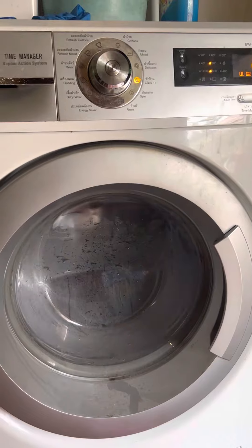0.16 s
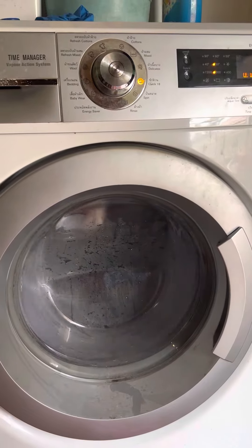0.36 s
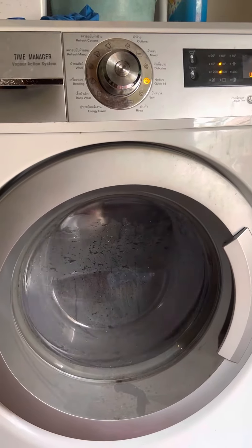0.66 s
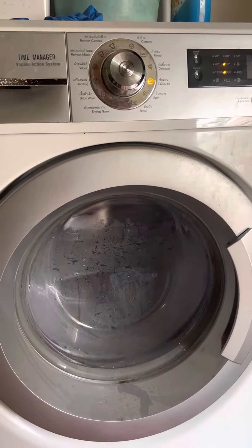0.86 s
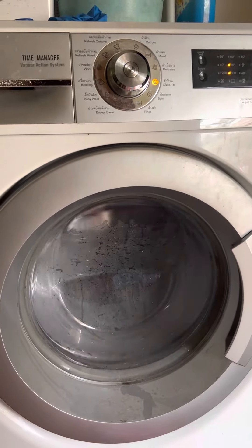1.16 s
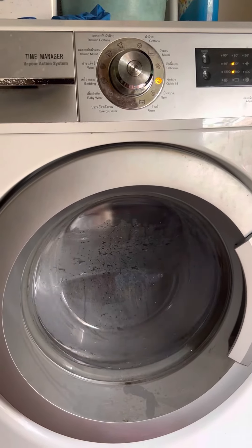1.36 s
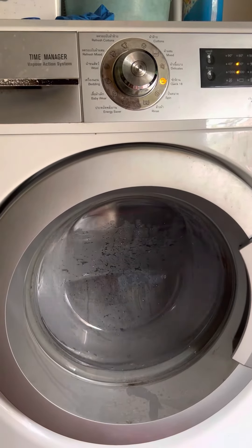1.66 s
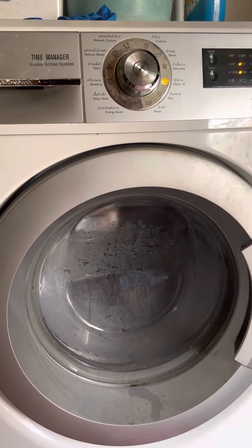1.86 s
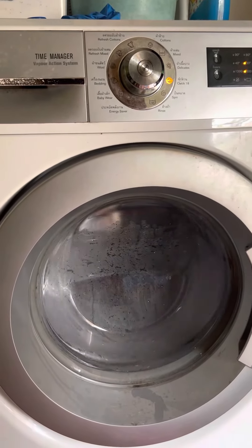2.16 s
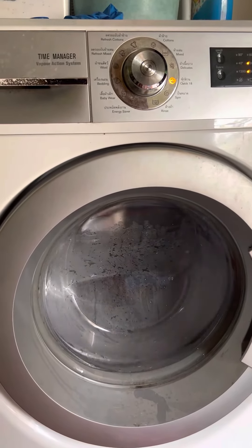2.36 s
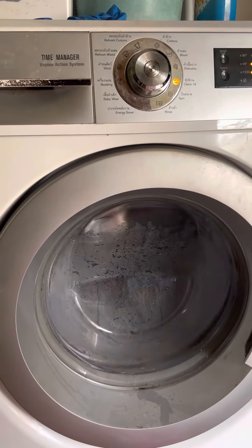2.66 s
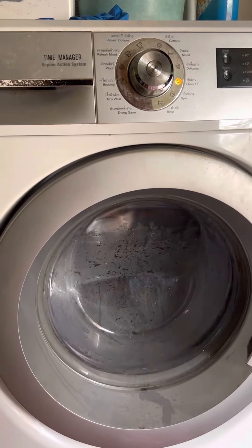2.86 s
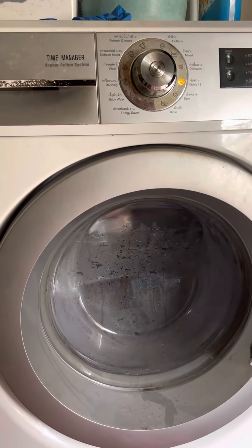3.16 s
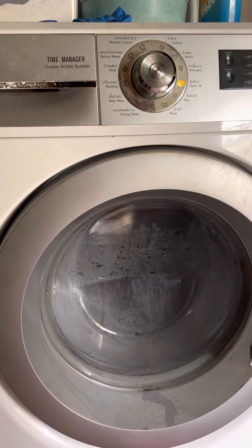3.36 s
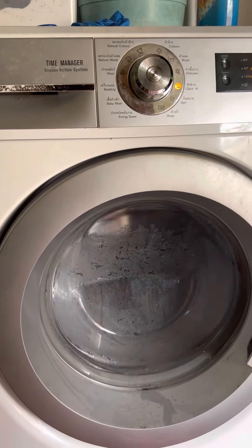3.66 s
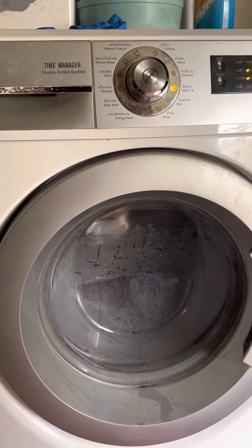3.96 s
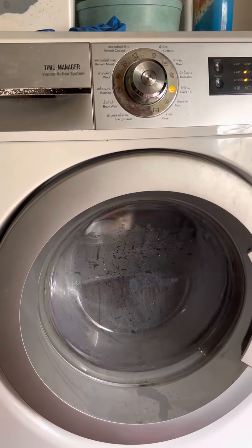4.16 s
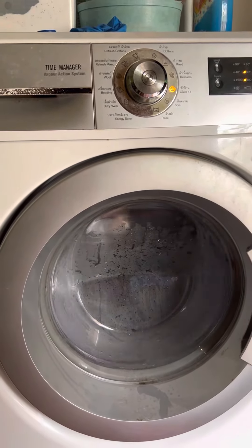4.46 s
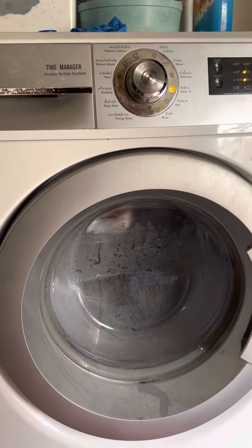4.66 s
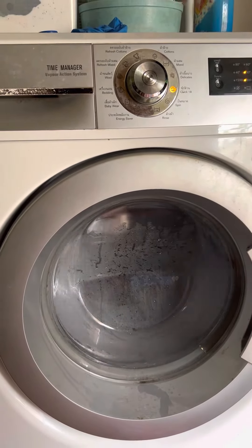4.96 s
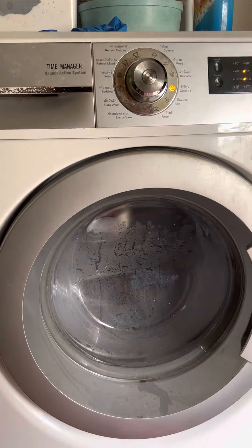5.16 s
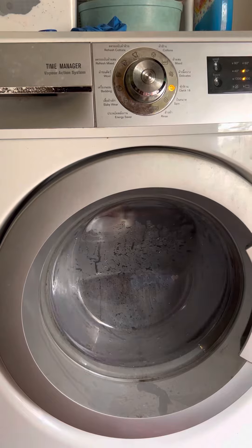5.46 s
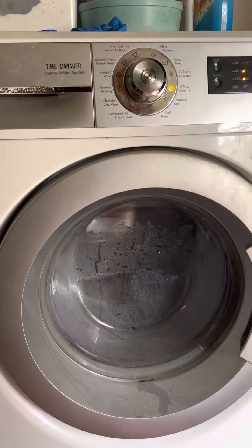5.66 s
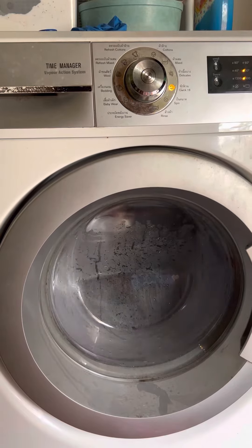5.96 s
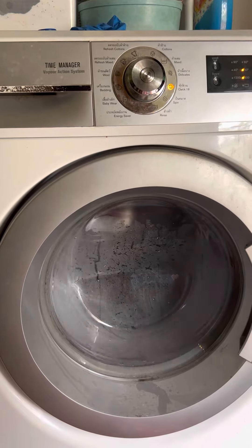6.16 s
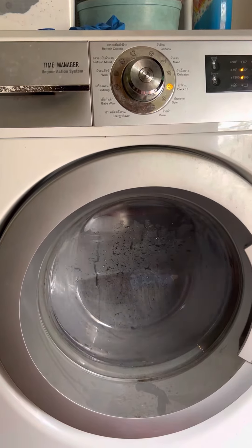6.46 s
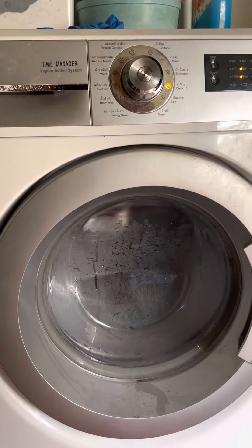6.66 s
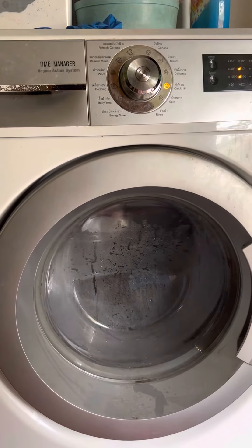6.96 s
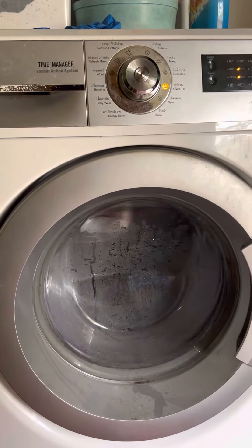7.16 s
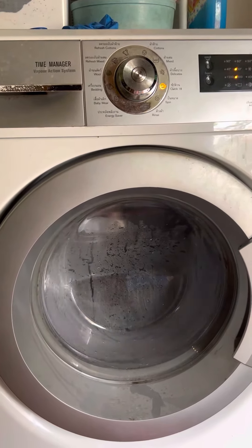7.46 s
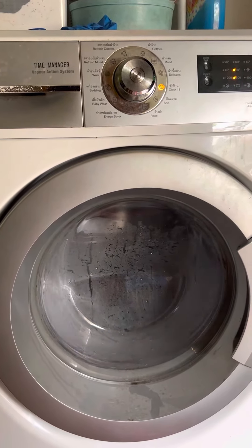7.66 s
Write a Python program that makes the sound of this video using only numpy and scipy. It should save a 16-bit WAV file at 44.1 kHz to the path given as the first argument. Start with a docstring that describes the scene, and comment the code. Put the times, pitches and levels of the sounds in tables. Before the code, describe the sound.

A front-loading washing machine spins in a small hard room, heard from just in front of its door. Fast, even knocks and a pulsing rumble run throughout, with a light hiss. Small clicks tap the door glass early on as the drum gains a little speed. The panels and door rattle hardest through the middle, then the shaking eases into a steadier drone.

```python
"""Rhythmic knocking and rattling: a front-loading washing machine spins up to speed in a small hard room.
The unbalanced load is a periodic force on the tub, so bearing knocks, panel rings and scuffs return
at the same drum angles every turn. Beneath them lie a rumble that repeats with the drum, air and belt
hiss, a booming floor and a faint motor whine. A phone with two microphones listens before the door."""
import sys
import numpy as np
from scipy import signal
from scipy.fft import rfft, irfft
from scipy.io import wavfile
from scipy.ndimage import uniform_filter1d

SR = 44100
rng = np.random.default_rng(int(sys.argv[2]) if len(sys.argv) > 2 else 0)


def dump(signal):
    """Clip the signal to [-1, 1] and save it as 16-bit WAV at the path in sys.argv[1]."""
    limited = np.clip(np.atleast_2d(signal).T, -1, 1)
    pcm = np.round(limited * 32767).astype(np.int16)
    wavfile.write(sys.argv[1], SR, pcm)


N = 343980
TIME = np.arange(N) / SR


def bearing_knocks(turns):
    """Impact excitation: seven knocks a turn push and pull alternately, ringing the tub and frame."""
    # Each row is one knock: level in dB at the start, near full speed, shaking hardest, settled.
    strengths = [(-18, -15, -13.5, -23), (-20, -20, -5.5, -6.5), (-12, -7, -28, -25), (-16, -10, -6, -14),
                 (-7, -15.5, -45, -20), (-23, -15, -18.5, -17), (-22, -18, -12, -16.5)]
    # Each row is a mode of the sprung tub or the frame: frequency in Hz, level in dB, T60 in seconds.
    tub_modes = [(140.4, -6, 0.047), (152.7, -1.5, 0.053), (211.6, 1, 0.03)]
    frame_modes = [(210.5, 1.5, 0.022), (250, -1.5, 0.041), (321, -8.5, 0.029)]
    stages_s = (1.4, 2.2, 3.3, 5.5, 6.2)
    levels_db = [np.interp(TIME, stages_s, [first, fast, hard, hard, last])
                 + staged(2, 4, 1) * wander(2.44) for first, fast, hard, last in strengths]
    first_angle = staged(.015, -.055, -.06)
    blows = np.zeros(N)
    for k, db in enumerate(levels_db):
        at = passes(turns - first_angle, k / len(levels_db))
        blows += (-1) ** k * uneven_blows(at, db[at], slip_s=.0001, scatter_db=.81)
    tub_share = staged(.44, .47, .8)
    tub = strike(blows * tub_share, tub_modes, contact_s=.0019)
    frame = strike(blows * (1 - tub_share), frame_modes, contact_s=.0047)
    # The cabinet is too small to radiate long wavelengths.
    return signal.sosfilt(signal.butter(3, 109, "high", fs=SR, output="sos"), tub + frame)


def loose_parts(turns):
    """Modal ringing: each loose part is struck at its own drum angles and decays freely."""
    # Each part lists its modes: frequency in Hz, level in dB, T60 in seconds.
    part_modes = { "left side panel": [(279.5, 1, 0.36), (255, -11, 0.15)],
                  "back panel": [(308.5, 0, 0.26)], "right side panel": [(192.23, 3.5, 0.29),
                  (114.94, -9, 0.21), (160.12, -5, 0.22)], "control panel": [(915, 0, 0.1), (1004, -2, 0.1),
                  (1100, -5, 0.08)], "front panel": [(657, 6.5, 0.07), (615, -5, 0.05)],
                  "kick plate": [(705, 0, 0.06), (738, -4, 0.06)], "dial": [(918, 0, .11)],
                  "top panel": [(376, 0, .1)], "door handle": [(577, 0, .12)], "zip": [(1800, 0, .015),
                  (1450, -4, .01), (2150, -4, .01), (3300, -14, .005)], "door": [(512, 0, 0.085),
                  (576, -5, 0.07)], "lid": [(378.5, -1, 0.15), (415.3, 2.5, 0.073), (455.2, -0.5, 0.072)],
                  "soap drawer": [(1320, -1, .05), (1420, 0, .055)], "plastic trim": [(1960, 0, .05),
                  (2060, -1, .05), (2310, 0, .05)], }
    # Each row: part, drum angle in turns, start and end in seconds, first and last level in dB.
    rattles = [ ("left side panel", .3, 0.87, 1.73, -20.5, -18),
               ("left side panel", 0.199, 6.24, 7.8, -29, -27.5),
               ("left side panel", .94, 2.8, 4.3, -23, -20), ("left side panel", .17, 3.2, 4.3, -23, -21),
               ("left side panel", 0.09, 4.6, 6, -19, -23), ("left side panel", .32, 4.4, 5.9, -24, -26),
               ("back panel", .3, 5.4, 6.4, -27, -23), ("back panel", .3, 6.7, 7.8, -28, -29),
               ("right side panel", 0.252, 0, 2.3, -23, -17.5),
               ("right side panel", .42, 3.43, 5, -18.5, -20),
               ("right side panel", 0.302, 5.56, 6.8, -26, -28),
               ("right side panel", 0.1606, 6.4, 9, -22.5, -25),
               ("control panel", 0.33, 1.5, 2.55, -30.5, -32.5), ("dial", .35, 4, 4.4, -28, -30),
               ("control panel", .15, 5.2, 6.9, -36, -36), ("control panel", .11, 7.3, 7.8, -35, -31),
               ("door handle", .16, 0, 1.3, -25, -23), ("front panel", .24, 1, 1.4, -28, -24),
               ("front panel", .185, 1.8, 2.6, -13.5, -12), ("kick plate", .09, 1.3, 2.8, -25, -21),
               ("kick plate", .1, 3, 4.5, -25, -28), ("kick plate", .08, 5.6, 7.8, -22, -21),
               ("door handle", .17, 5.9, 7.36, -22.5, -24.5), ("door handle", .37, 2.7, 3.5, -16.5, -19.5),
               ("door handle", .25, 5.4, 5.2, -23, -25.5), ("zip", .64, 1.7, 2.7, -29, -30),
               ("zip", .96, 2.8, 3.4, -30, -29), ("front panel", 0.48, 1.6, 2.3, -23.5, -31),
               ("front panel", 0.16, 3, 5.2, -22.5, -26), ("front panel", 0.18, 5.4, 6.7, -27.5, -23),
               ("door", 0.21, 0, 1.2, -23, -25), ("door", 0.1587, 5.5, 6.9, -24.5, -24.5),
               ("door", .4, 2.5, 4.53, -15.5, -12), ("door", .38, 4.86, 5.5, -23, -21),
               ("door", 0.69, 0, 1, -24.5, -28.5), ("door", .8, 1.63, 2.8, -20.5, -14.5),
               ("door", .8, 4.1, 5.96, -22, -27.5), ("lid", .28, .3, 1.4, -17, -19),
               ("lid", .385, 3, 3.8, -21.5, -17), ("lid", .29, 5, 5.55, -19, -22.5),
               ("top panel", 0.162, 7.16, 8.8, -26, -25), ("top panel", .24, 4.6, 5.47, -20.5, -21),
               ("lid", .83, 0.63, 3.12, -20.5, -17), ("lid", .85, 4.3, 5.98, -19, -20),
               ("soap drawer", .28, 1.7, 2.8, -40, -40), ("soap drawer", .255, 3.6, 5.5, -25, -29),
               ("plastic trim", 0.32, 3.8, 4.7, -25.5, -26), ("plastic trim", .33, 3.8, 6.15, -32.5, -28.5),
               ]
    # Each row: time in seconds, depth in dB to which the leaning tub mutes the left panel.
    muting = [(2.9, 0), (3.7, 9), (4.6, 12), (5.6, 12), (6.3, 6)]
    # Each row is one blow, of the trim or of a zip on the door glass: time in seconds, peak in dB.
    trim_snaps = [(5.6755, -23.5), (5.7633, -22)]
    zip_clacks = [(0.185, -28), (0.2957, -27), (0.405, -23.5), (0.513, -25), (0.622, -23), (0.834, -31),
                  (1.02, -34), (1.047, -32), (1.128, -28), (1.1484, -29), (1.1808, -21.5), (1.2836, -21.5),
                  (1.307, -27), (1.3547, -24), (1.3856, -23), (1.405, -25), (1.433, -31), (1.5563, -25),
                  (1.606, -28), (1.9998, -35)]
    rings = {}
    for name, modes in part_modes.items():
        blows = spell_blows(name, rattles, turns, slip_s=.00015, scatter_db=.87)
        rings[name] = strike(blows, modes, contact_s=min(.008, 4.5 / modes[0][0]))  # high parts: briefer
    leaning = (1 - np.tanh(2 * np.cos(2 * np.pi * (turns - .19)))) / 2  # freest at .19 turn
    rings["left side panel"] *= undb(-curves(muting)[0] * leaning)
    snaps = strike(single_blows(trim_snaps), part_modes["plastic trim"], contact_s=.0038)
    clacks = strike(single_blows(zip_clacks), part_modes["zip"], contact_s=.0013)
    return sum(rings.values()) + snaps + clacks


def drum_rumble(turns):
    """Quasi-periodic noise: each turn keeps part of the last one's roughness, more as speed builds."""
    # Each row: frequency in Hz, relative spectral density in dB.
    spectrum = [(38, -18), (55, -21.5), (75, -9), (100, -8.5), (170, -3), (280, -2.5), (330, -8), (450, -7),
                (600, -7), (740, -13.5), (800, -17.5), (1100, -21.5), (1500, -28), (2300, -25.5),
                (2700, -45), (4000, -63)]
    steps = 1024  # per turn
    roughness = rng.standard_normal((int(turns[-1]) + 2, steps))
    correlation = np.interp(TIME, [0, 3.3], [.46, .934])
    kept = np.interp(np.arange(len(roughness)), turns, correlation)
    for k in range(1, len(roughness)):
        roughness[k] = kept[k] * roughness[k - 1] + np.sqrt(1 - kept[k] ** 2) * roughness[k]
    return colour(roughness.ravel()[(turns * steps).astype(int)], spectrum)


def scuffs(turns):
    """Stick-slip friction: grit catches as the load passes, dies away and rings the rubbed surface."""
    # Each surface: its modes (frequency in Hz, level in dB, T60 in seconds), rub decay time in seconds.
    surfaces = { "door seal": ([(1700, -7, .012), (1900, -2, .014), (2100, -1, .015), (2350, -2, .015),
                (2550, -3, .012), (2950, -2, .008)], .018), "strap on the door glass": ([(1400, -5, .02),
                (1800, -2, .008), (2200, -2, .007), (3300, -8, .01)], .008),
                "tub mounts": ([(1900, -2, .005), (2300, 4, .008), (3450, -6, .005), (4200, -5, .005),
                (4810, -3, .006), (7560, -14, .005)], 0.013), }
    # Each row: surface, drum angle in turns, start and end in seconds, first and last level in dB.
    rubs = [("door seal", .44, 6.1, 7.8, -35, -36), ("door seal", .55, 5.7, 7.8, -35, -37),
            ("strap on the door glass", .72, 0, 1.5, -35, -34),
            ("strap on the door glass", .8, 1.8, 2.5, -36, -37),
            ("strap on the door glass", .45, 1.05, 1.5, -30, -30),
            ("strap on the door glass", .6, 2.9, 3.3, -33, -33), ("tub mounts", .11, 1.1, 3, -37, -37),
            ("tub mounts", .27, 3.7, 4.55, -32, -30), ("tub mounts", .17, 4.8, 5.6, -33, -34),
            ("tub mounts", .09, 5.8, 7.8, -39, -38)]
    unevenness, grip_s = .55, .0003
    sound = 0
    for name, (modes, decay_s) in surfaces.items():
        touches = spell_blows(name, rubs, turns, slip_s=.002, scatter_db=.88)
        pressure = signal.oaconvolve(touches, np.exp(-TIME[:SR // 8] / decay_s))[:N]
        grains = rng.standard_normal(N) * rng.exponential(size=N) ** unevenness
        steady_rms = np.std(strike(grains, modes, grip_s))
        sound += strike(pressure * grains, modes, grip_s) / steady_rms
    return sound


def hiss(treble_db):
    """Modulated broadband noise of air, belt and fine rattle: two bands flicker partly independently."""
    # Each row: frequency in Hz, relative spectral density in dB.
    spectrum = [(400, -31), (800, -3.5), (1300, -7.5), (1900, 0.5), (2250, 3.5), (2450, -0.5), (2750, -5.5),
                (3100, -6.5), (3500, -8), (4100, -13), (4800, -9.5), (5200, -12), (5600, -18),
                (7000, -16.5), (10000, -28), (13500, -25), (15500, -22.5)]
    air = colour(rng.standard_normal(N), spectrum)
    low = signal.sosfilt(signal.butter(4, 3300, fs=SR, output="sos"), air)
    flicker = undb(.5 * wander(30) + wander(150))
    return flicker * (undb(3.1 * wander(60)) * low + undb(treble_db + .76 * wander(60)) * (air - low))


def floor_boom(turns):
    """Forced vibration: the floor follows harmonics of the drum's rotation."""
    # Each row: harmonic, start and end in seconds, first and last level in dB, rise and fall in dB/s.
    booms = [(5, 2.2, 2.95, -30, -29.5, 19, 150), (4, 6.4, 7.2, -37, -36, 22, 60),
             (5, 0, 7.8, -47, -49, 50, 50), (8, 3, 5.1, -39, -39, 15, 12), (11, 3.4, 5.4, -33, -33, 15, 15)]
    return sum(undb(spell(TIME, *shape)) * np.sin(2 * np.pi * harmonic * turns)
               for harmonic, *shape in booms)


def motor_whine():
    """Narrowband tones: two faint, high lines waver in pitch and level."""
    # Each row: frequency in Hz, level in dB.
    lines = [(12123, -82), (12400, -81)]
    return sum(undb(db + 3 * wander(3)) * wavering_sine(hz, 14, rate=6) for hz, db in lines)


def thin_tone():
    """Amplitude modulation: a thin tone swells, flutters and fades."""
    # Each row: pitch in Hz, start and end in seconds, first and last level in dB, rise and fall in dB/s.
    tones = [(1087, 2.9, 3.4, -49, -55, 42, 60)]
    return sum(undb(spell(TIME, *shape) + 2 * wander(13)) * wavering_sine(hz, 3, rate=4.6)
               for hz, *shape in tones)


def room(machine):
    """Superposition: each channel has the direct sound at its own level and phase, plus reverberation."""
    # Each row: frequency in Hz, phase by which the left channel leads the right, in radians.
    # It widens the treble.
    channel_phase = [(0, 0), (45, -.02), (120, -.06), (1460, -0.3), (2500, 2.4), (3100, 1.1), (3880, 0.5),
                     (5340, 2.8), (6030, 3.5), (6980, 6.1), (8180, 6.3), (9220, 9.2), (10900, 9.6),
                     (11800, 12.6), (13600, 12.6), (14000, 15.7)]
    # Each row: frequency in Hz, left minus right level in dB.
    left_excess = [(60, 0.0), (110, 0.0), (200, 0.0), (370, 0.5), (670, 2.5), (1230, 3.0), (2250, -1.5),
                   (4110, -1.5), (7530, 0.0), (13800, 0.0)]
    # Each row: frequency in Hz, level of the wall reflections in dB.
    reflections = [(60, -34), (250, -18.5), (600, -6.5), (1200, -6.5), (2500, -4), (5000, -8), (9000, -2.5),
                   (14000, -41)]
    t60_s = .18
    left = undb(over_hz(left_excess) / 2) * np.exp(.5j * over_hz(channel_phase))
    tails = rng.standard_normal((2, SR // 2)) * 1000. ** (-TIME[:SR // 2] / t60_s)
    tails /= np.linalg.norm(tails, axis=1, keepdims=True)
    reverberation = rfft(tails, N) * undb(over_hz(reflections))
    return irfft(rfft(machine) * (np.array([left, 1 / left]) + reverberation), N)


def strike(blows, modes, contact_s):
    """Convolution with damped modes: each ring swells in and peaks at its blow's level and moment."""
    t = TIME[:SR // 4]
    ring = sum(undb(db) * np.sin(2 * np.pi * hz * t) * 1000. ** (-t / t60) for hz, db, t60 in modes)
    ring *= 1 - np.exp(-t / contact_s)
    peak = np.argmax(np.abs(ring))
    return signal.oaconvolve(blows, ring / np.abs(ring[peak]))[peak:peak + N]


def uneven_blows(at, db, slip_s, scatter_db):
    """Jitter: impulses near the given samples, uneven in time and force."""
    slip, scatter = rng.standard_normal((100, 2))[:len(at)].T
    blows = np.zeros(N)
    blows[np.clip(at + (slip * slip_s * SR).astype(int), 0, N - 1)] = undb(db + scatter_db * scatter)
    return blows


def spell_blows(name, table, turns, slip_s, scatter_db):
    """Periodic forcing: one blow a turn for each row that names this part."""
    rows = [(passes(turns, angle), shape) for part, angle, *shape in table if part == name]
    return sum(uneven_blows(at, spell(TIME[at], *shape), slip_s, scatter_db) for at, shape in rows)


def single_blows(table):
    """Isolated impulses at listed times and levels."""
    blows = np.zeros(N)
    for s, db in table:
        blows[int(s * SR)] = undb(db)
    return blows


def passes(turns, angle):
    """Phase locking: the samples at which the drum passes an angle."""
    marks = np.arange(-1, turns[-1] + 1) + angle
    return np.searchsorted(turns, marks[(marks > 0) & (marks < turns[-1])])


def throb(turns, angle, depth_db):
    """Periodic gain, greatest as the load passes the angle."""
    phase = 2 * np.pi * (turns - angle)
    return undb(depth_db * (np.cos(phase) + .69 * np.cos(2 * phase)))


def staged(early, hardest, settled):
    """A value gliding through the three stages of the spin."""
    # In seconds: the early stage ends, the hardest shaking starts and ends, the spin has settled.
    stages_s = [2.3, 3.3, 5.1, 6.3]
    return np.interp(TIME, stages_s, [early, hardest, hardest, settled])


def spell(t, start_s, end_s, first_db, last_db, rise_db_s=22, fall_db_s=22):
    """An envelope in dB that rises, holds on a slope and falls away."""
    held_db = np.interp(t, [start_s, end_s], [first_db, last_db])
    return held_db - rise_db_s * np.maximum(start_s - t, 0) - fall_db_s * np.maximum(t - end_s, 0)


def wavering_sine(hz, drift_hz, rate):
    """Random frequency modulation of a sine."""
    return np.sin(2 * np.pi * np.cumsum(hz + drift_hz * wander(rate)) / SR)


def wander(rate):
    """Low-pass noise: random levels held 1 / rate seconds and smoothed twice."""
    hold = int(SR / rate)
    steps = np.repeat(rng.standard_normal(N // hold + 1), hold)
    return uniform_filter1d(uniform_filter1d(steps, hold), hold)[:N]


def colour(noise, spectrum):
    """Spectral shaping, scaled to unit rms."""
    shaped = irfft(rfft(noise) * undb(over_hz(spectrum)), N)
    return shaped / np.std(shaped)


def over_hz(table):
    """A table interpolated onto the FFT bins along a log axis."""
    hz, value = np.transpose(table)
    return np.interp(np.log(np.fft.rfftfreq(N, 1 / SR) + 20), np.log(hz + 20), value)


def curves(table):
    """A table's columns interpolated in time."""
    s, *columns = np.transpose(table)
    return [np.interp(TIME, s, column) for column in columns]


def undb(db):
    """Decibels as an amplitude ratio."""
    return 10 ** (np.asarray(db) / 20)


def scene():
    """One rotation times the knocks, rattles and throb; all sources add in the room."""
    # Each row: time in seconds, drum speed in turns per second.
    drum_speed = [(0, 8.885), (2.4, 10.462), (2.8, 10.713), (3.1, 10.806), (3.5, 10.789), (4, 10.747),
                  (4.5, 10.746), (5, 10.714), (5.5, 10.661), (6, 10.625), (7, 10.656), (7.8, 10.69)]
    # Each row: time in seconds, then rumble level, hiss level and extra hiss treble, all in dB.
    shaking = [(0, -27, -39, -2.5), (1, -24, -40, -0.5), (2, -21.5, -39.5, 1), (3.3, -22, -40, 1),
               (4, -22, -40.5, 3), (4.5, -22, -40.5, 1.5), (5, -23, -40.5, 2), (6, -25.5, -40.5, 1.5),
               (7, -26.5, -43.5, 1.5), (7.8, -24, -39.5, 1)]
    turns = np.cumsum(curves(drum_speed)[0]) / SR
    rumble_db, hiss_db, treble_db = curves(shaking)
    machine = bearing_knocks(turns) + loose_parts(turns) + scuffs(turns)
    machine += np.sqrt(2) * (floor_boom(turns) + motor_whine() + thin_tone())
    machine += undb(rumble_db) * throb(turns, angle=.16, depth_db=1.85) * drum_rumble(turns)
    hiss_gain = undb(hiss_db) * throb(turns, angle=staged(.22, .32, .24), depth_db=staged(2, 1, 2))
    machine += hiss_gain * hiss(treble_db)
    # Some hiss reaches each microphone by its own way round the room.
    scattered = undb(-12.5) * hiss_gain * np.array([hiss(treble_db), hiss(treble_db)])
    return room(machine) + scattered


def record(dry):
    """Band limiting: the phone drops the deepest bass and the highest treble."""
    dry = signal.sosfilt(signal.butter(5, 40, "high", fs=SR, output="sos"), dry)
    return signal.sosfilt(signal.ellip(8, .2, 70, 14300, fs=SR, output="sos"), dry)


dry = scene()
out = record(dry)
dump(out)
```